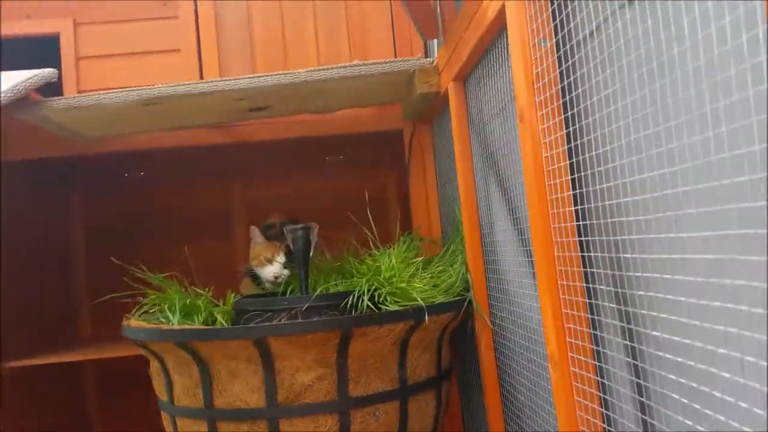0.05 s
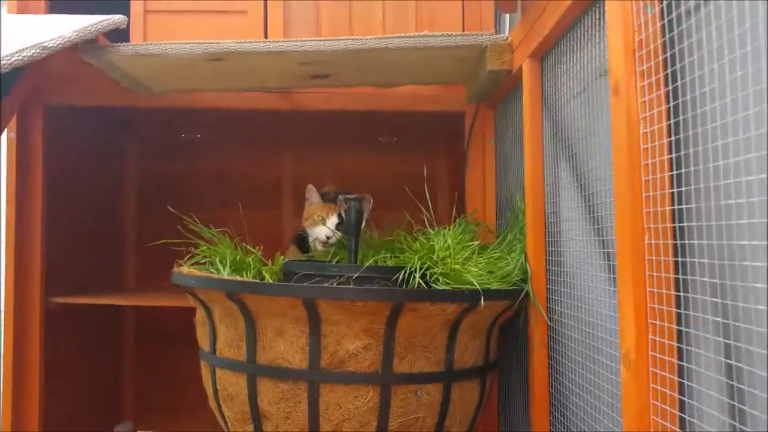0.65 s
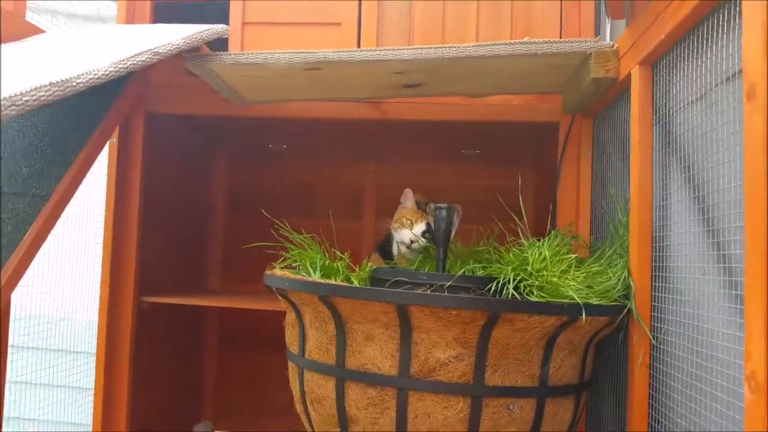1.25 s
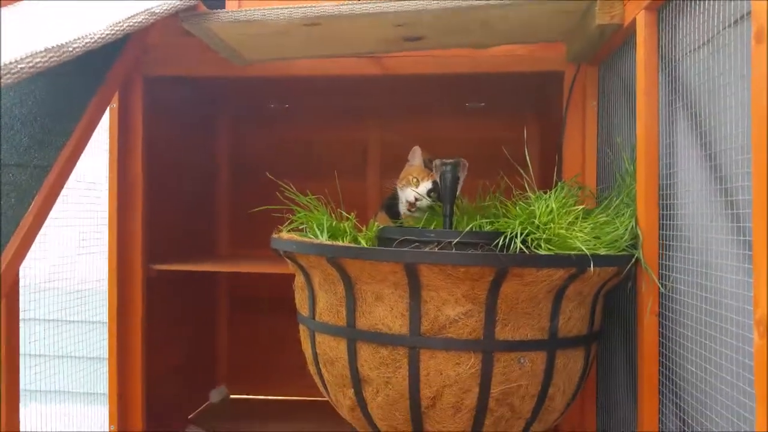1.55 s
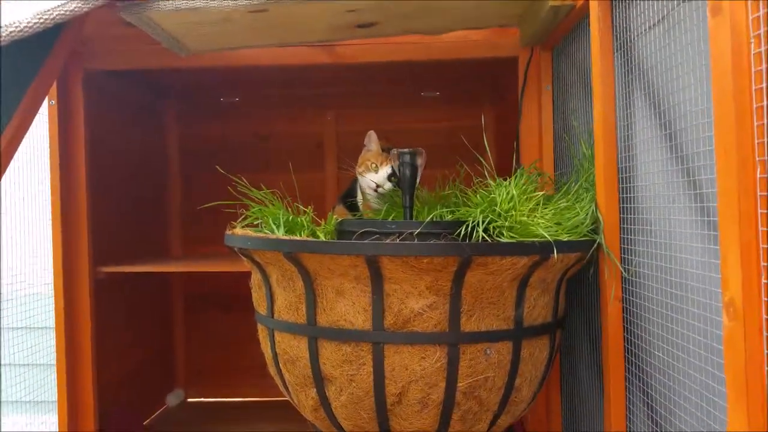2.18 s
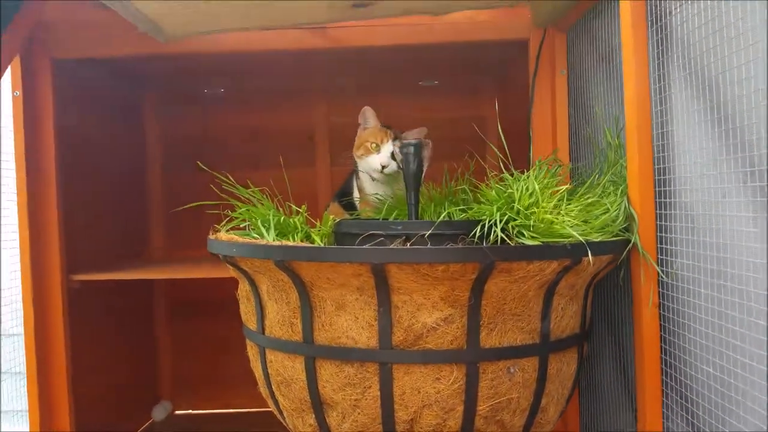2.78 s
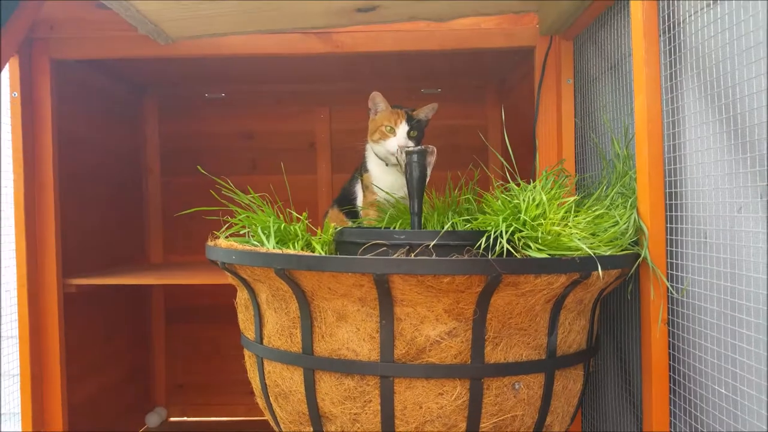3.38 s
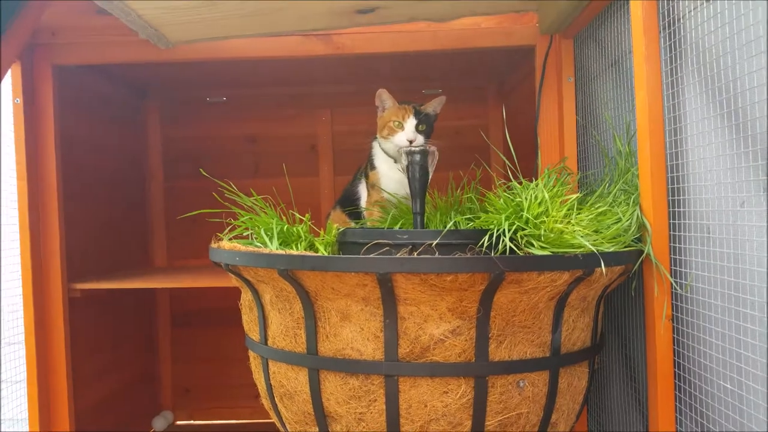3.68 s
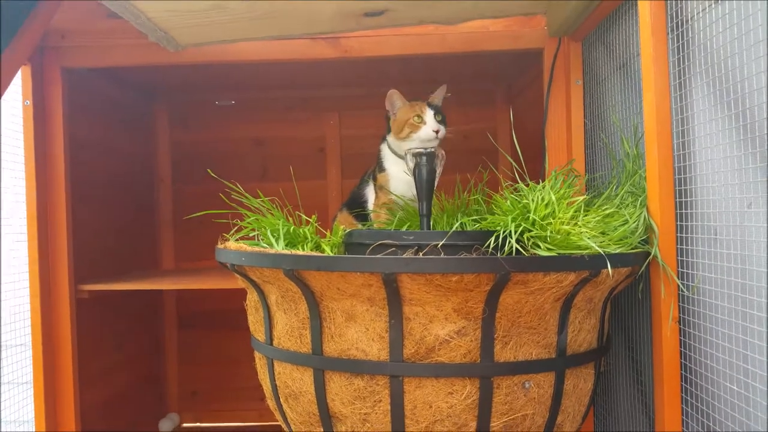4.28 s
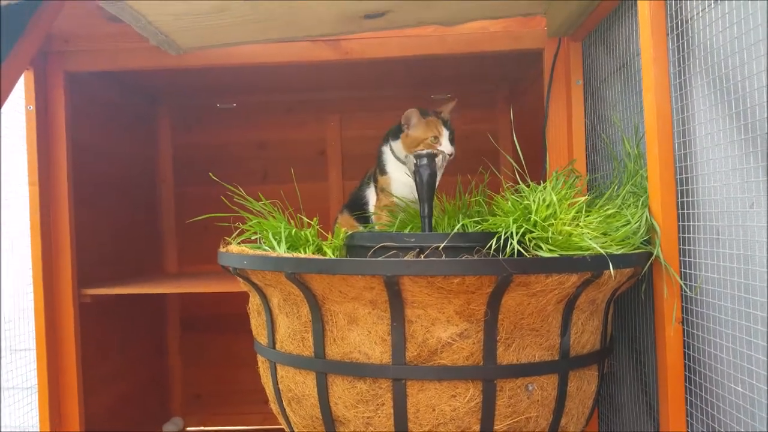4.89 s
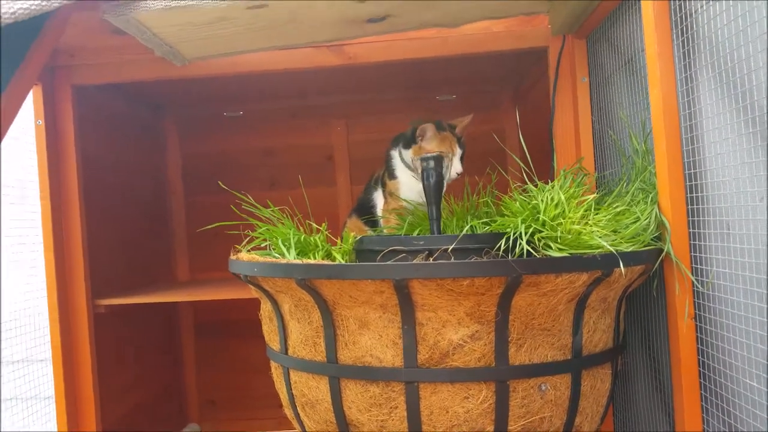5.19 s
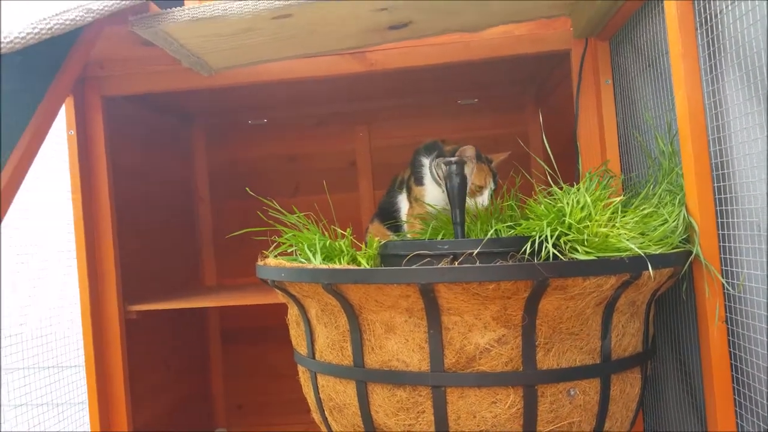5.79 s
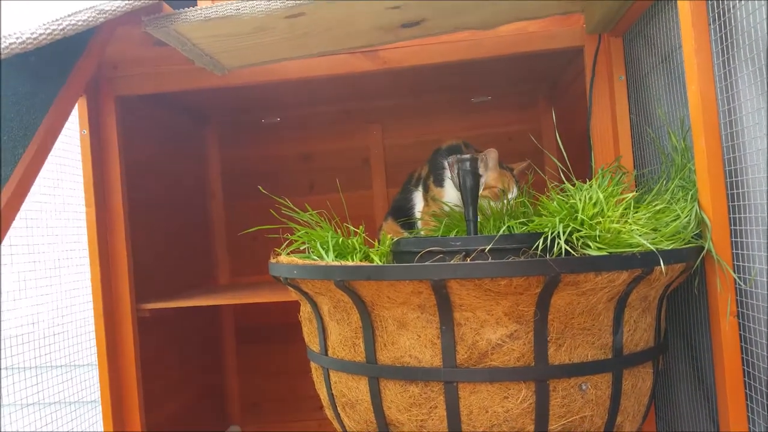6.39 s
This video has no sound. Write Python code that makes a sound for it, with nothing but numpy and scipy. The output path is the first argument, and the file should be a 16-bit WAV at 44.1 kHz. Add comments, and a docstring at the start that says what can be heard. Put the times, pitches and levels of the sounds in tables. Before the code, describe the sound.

Gentle, bright trickling runs throughout as a thin fountain stream breaks into quick drips, tiny bubbles and splashes near the microphone. The boards of an outdoor hutch add a very short echo. A far engine drones low at first and gradually dies down over distant traffic. There are a few faint rustles in the planter and, later, a single soft knock on the plastic basin.

```python
"""Pet fountain in a wooden hutch

A small fountain trickles in a planter inside an open hutch, outdoors. Drops trap air bubbles that plink,
others spatter on the plastic basin, and the thin stream fizzes; the basin is bumped once. The boards
throw the water's sound back. Behind lie a distant engine slowing down, a faint motor whine and traffic."""
import sys
import numpy as np
from scipy import signal
from scipy.fft import rfft, irfft, next_fast_len
from scipy.io import wavfile

SR = 44100
rng = np.random.default_rng(int(sys.argv[2]) if len(sys.argv) > 2 else 0)


def wav_record(signal):
    """Record a signal, one row per channel, as 16-bit PCM in the file named by sys.argv[1]."""
    frames = np.transpose(np.atleast_2d(signal))
    bounded = np.clip(frames, -1, 1)
    # unit amplitude maps onto the largest positive 16-bit level
    quanta = np.round(bounded * 32767).astype(np.int16)
    wavfile.write(sys.argv[1], SR, quanta)


N = 293265
TIME = np.arange(N) / SR
DRIP_REFERENCE_S = .015  # a drip's energy is that of a steady sound this long


# The foreground plinks, one trapped bubble each: (time [s], pitch [Hz], level [dB])
CLEAR_DRIPS = [(.008, 6600, -58), (0.051, 2530, -55), (0.055, 6200, -57), (.116, 7100, -58),
               (.216, 6400, -59), (.218, 1876, -58), (0.266, 4430, -57), (.286, 1714, -54),
               (0.309, 5100, -51), (.355, 3220, -59), (0.416, 1800, -54.5), (0.624, 4400, -60),
               (0.743, 5300, -52.5), (0.818, 4500, -46.5), (.8634, 7030, -56.5), (.896, 1760, -46.5),
               (1.018, 6900, -49.5), (1.073, 5420, -49.5), (1.071, 1770, -58), (1.081, 2410, -49.5),
               (1.086, 3350, -49), (1.155, 3790, -53), (1.173, 6400, -54.5), (1.307, 6000, -55.5),
               (1.459, 4300, -52), (1.460, 5570, -54.5), (1.509, 4340, -54.5), (1.582, 3420, -56.5),
               (1.584, 5000, -55), (1.645, 1650, -44.5), (1.683, 2850, -60), (1.751, 3200, -55.5),
               (1.774, 6470, -59), (1.777, 3577, -57.5), (1.863, 3300, -53), (1.912, 5700, -56.5),
               (1.974, 2700, -55), (2.024, 5170, -54), (2.178, 2540, -57.5), (2.28, 2610, -55.5),
               (2.319, 6000, -53), (2.343, 2780, -55), (2.361, 5800, -58), (2.3895, 3150, -54.5),
               (2.481, 5940, -58.5), (2.61, 5030, -53.5), (2.72, 5230, -49.5), (2.801, 5940, -57),
               (2.835, 2570, -56.5), (2.879, 6380, -56.5), (2.932, 3196, -57), (2.965, 3980, -51.5),
               (2.965, 6360, -54), (2.991, 5200, -55), (3.133, 3650, -52), (3.135, 5700, -57),
               (3.198, 3600, -57), (3.232, 5600, -55), (3.268, 3210, -58), (3.362, 6280, -57),
               (3.422, 4150, -47.5), (3.447, 5330, -52), (3.527, 5600, -57), (3.54, 6030, -53.5),
               (3.645, 6120, -53), (3.678, 7140, -54.5), (3.714, 5447, -56.5), (3.877, 4800, -52.5),
               (3.999, 5100, -58.5), (4.035, 3400, -50.5), (4.056, 6335, -57), (4.091, 6330, -55.5),
               (4.14, 5730, -59), (4.231, 7100, -56.5), (4.241, 1976, -54.5), (4.24, 3287, -54.5),
               (4.293, 2885, -58), (4.308, 5700, -58.5), (4.406, 2780, -55.5), (4.547, 6850, -56.5),
               (4.577, 3400, -52), (4.679, 3010, -51), (4.704, 2343, -54.5), (4.819, 6740, -57),
               (4.881, 3204, -57), (4.947, 2454, -56), (4.98, 5400, -61), (5.1804, 3160, -52),
               (5.222, 2790, -54.5), (5.374, 3300, -51), (5.375, 6070, -42.5), (5.418, 5880, -54),
               (5.453, 2522, -46.5), (5.481, 6000, -50), (5.568, 3600, -58), (5.634, 5800, -51),
               (5.793, 5700, -57), (5.8742, 3276, -55.5), (5.894, 5740, -57), (5.992, 6320, -52.5),
               (6.037, 2950, -43.5), (6.0566, 4930, -47), (6.075, 6500, -59), (6.1714, 5920, -59),
               (6.186, 6610, -55), (6.194, 2700, -45.5), (6.229, 3720, -53), (6.245, 5700, -56),
               (6.2922, 3650, -46.5), (6.339, 6400, -60), (6.373, 2580, -56), (6.378, 5480, -53.5),
               (6.389, 3130, -47), (6.455, 6500, -52), (6.521, 5700, -57), (6.616, 5610, -55)]

def clear_drips():
    """The drops that stand out of the trickle."""
    out = np.zeros((2, N))
    for s, hz, db in CLEAR_DRIPS:
        add(out, s, drip(hz, db))
    return out


# Drip voicing: large bubbles ring cleanly on the left, small ones splash on the right:
# (pitch [Hz], left over right [dB], splash share [0-1], snap [dB], splash width [octaves])
DRIP_VOICING = [(1800, 8.5, .14, -1, 0.09), (2700, 2.5, 0.78, 9, 0.12), (3400, -4, 0.82, 9, 0.16),
                (5000, -3.5, 0.92, 6, 0.35), (6500, -5, 0.62, 5, 0.21)]

def drip(hz, db, max_glide=.037, far_ear_lag_s=.00019):
    """One drip, part ring and part splash by its size; it reaches the far ear a little later."""
    pitches, *columns = np.transpose(DRIP_VOICING)
    side_db, splash_share, snap_db, octaves = [np.interp(hz, pitches, c) for c in columns]
    ring = plink(hz, max_glide * rng.random(), t60_at_4khz=.011, size_power=1.75, fade_power=1.56)
    blend = np.sqrt(1 - splash_share) * ring + np.sqrt(splash_share) * splash(hz, snap_db, octaves)
    ears = amp(db) * pan(side_db) * blend
    far = int(side_db > 0)
    ears[far] = np.roll(ears[far], round(far_ear_lag_s * SR))
    return ears


def plink(hz, glide, t60_at_4khz, size_power, fade_power=1, rise_at_4khz=.0003):
    """A bubble swells and rings down, large ones slowest; its pitch climbs as it nears the surface."""
    t = np.arange(SR // 12) / SR
    size = 4000 / hz  # relative to a 4 kHz bubble
    t60 = t60_at_4khz * size ** size_power
    cycles = np.cumsum(hz * (1 + glide * np.minimum(t / t60, 1))) / SR
    attack = 1 - np.exp(-t / (rise_at_4khz * size ** 2))
    fade = np.exp(-np.log(1000) * (t / t60) ** fade_power)
    return drip_energy(np.sin(2 * np.pi * cycles) * attack * fade)


def splash(hz, snap_db, octaves, t60=.063, rise_s=.0003, snap_s=.0018, grain_db=3, top_hz=7100):
    """Torn water around a new bubble: a quick snap, then a brief crackle spread about its pitch."""
    t = np.arange(SR // 12) / SR
    crackle = band(grit(len(t), grain_db), hz, octaves)
    crackle = signal.sosfilt(signal.butter(12, top_hz, fs=SR, output="sos"), crackle)
    attack = 1 - np.exp(-t / rise_s)
    snap = amp(snap_db * np.exp(-(t / snap_s) ** 2))
    return drip_energy(crackle * attack * snap * decay(t, t60))


def soft_drips(level_db=-63, spread_db=2, low_hz=2600, high_hz=6800, lean=.582):
    """Weaker drips between the clear ones, leaning towards small bubbles."""
    out, chances = np.zeros((2, N)), rng.uniform(size=(200, 2))
    for s, (height, strength) in zip(drop_times(per_s=11.6, jitter=.3), chances):
        hz = low_hz * (high_hz / low_hz) ** (height ** lean)
        add(out, s, drip(hz, level_db + spread_db * (2 * strength - 1)))
    return out


def drop_times(per_s, jitter):
    """The stream breaks into drops at a loose beat; jitter is a share of the gap between them."""
    beats = np.arange(200) + jitter * rng.standard_normal(200)
    return beats[(beats > 0) & (beats < per_s * TIME[-1])] / per_s


def pops(level_db=-67, spread_db=3, low_hz=2300, high_hz=6800, count=360):
    """Tiny bubbles pop between the drips and join them into one trickle."""
    out = np.zeros((2, N))
    for when, height, strength in rng.random((count, 3)):
        hz = low_hz * (high_hz / low_hz) ** height
        add(out, when * TIME[-1], drip(hz, level_db + spread_db * (2 * strength - 1)))
    return out


# Bright accents, the hardest drops on the basin: (time [s], level [dB], centre [Hz], width [octaves])
HARD_SPATTERS = [(.22, -44.5, 10000, 0.83), (0.318, -42, 7000, 1), (.47, -45, 11000, 0.84),
                 (0.818, -48, 9400, .6), (.892, -48, 8000, .5), (1.0715, -42, 8500, 0.75),
                 (1.16, -40.5, 13500, 0.56), (1.39, -48, 12400, 0.28), (1.459, -46, 11000, .5),
                 (1.503, -46, 8000, 0.69), (1.655, -41, 11000, .25), (2.028, -45, 10600, .5),
                 (2.302, -42, 9800, 0.72), (2.719, -50, 10700, .5), (2.825, -47, 12500, .4),
                 (3.126, -46, 10000, .3), (3.339, -46, 10600, .2), (3.368, -46, 11100, 0.22),
                 (3.54, -44, 8700, .4), (3.897, -52, 9080, 0.18), (4.138, -50, 12000, 0.71),
                 (4.294, -45.5, 10600, 0.16), (4.39, -48, 11510, 0.17), (4.528, -53, 12970, 0.18),
                 (4.666, -44, 10600, .45), (4.824, -42, 9000, 1), (4.837, -51, 9900, 0.95),
                 (4.878, -40, 8350, 0.74), (5.044, -42, 6990, 0.51), (5.164, -42, 14000, .3),
                 (5.179, -39, 8980, 1), (5.541, -42, 10500, 0.46), (5.625, -48, 10600, 0.35),
                 (5.72, -45, 13500, .35), (5.8753, -47, 8500, .7), (5.893, -45, 7500, 0.45),
                 (5.97, -44, 10850, 0.43), (6.129, -52, 9300, .15), (6.153, -42, 10540, .3),
                 (6.276, -46, 8400, 0.27), (6.455, -44, 8200, 0.84), (6.549, -42.5, 9000, 0.14),
                 (6.557, -47, 9350, .2)]
# EQ of a bursting drop: (frequency [Hz], level [dB])
SPATTER_EQ = [(300, -10), (1000, -12), (3400, 8), (6300, -2.5), (7800, -3), (10500, -4.5), (13000, -8),
              (16000, -7.5)]

def spatters(trim_db=-6.5, soft_db=-55, spread_db=1, soft_hz=9800, scatter_octaves=.25):
    """Drops hit the basin: the hard ones, and a patter of soft spits, each with its own pitch."""
    out, chances = np.zeros((2, N)), rng.standard_normal((200, 2))
    for s, db, hz, octaves in HARD_SPATTERS:
        add(out, s, burst(db, hz, octaves))
    for s, (height, strength) in zip(drop_times(per_s=13, jitter=.46), chances):
        hz = soft_hz * 2 ** (scatter_octaves * height)
        add(out, s, burst(soft_db + spread_db * np.tanh(strength), hz, octaves=.15))
    return amp(trim_db) * colour(out, SPATTER_EQ)


def burst(db, hz, octaves, rise_s=.001, t60=.073, broadband_db=-13):
    """A drop bursts into a short shower of droplets, most of them of one size."""
    t = np.arange(SR // 8) / SR
    ticks = unit(grit(len(t), grain_db=1))
    shower = unit(band(ticks, hz, octaves)) + amp(broadband_db) * ticks
    attack = 1 - np.exp(-t / rise_s)
    return amp(db) * attack * decay(t, t60) * shower


# How strongly the small bubbles speak across their range: (pitch [Hz], level [dB])
GURGLE_BALANCE = [(1500, -11), (2300, 6), (3300, 3.5), (4700, 2.5), (5600, 6.5), (6500, 3), (7600, -3.5),
                  (12000, -17)]

def gurgle(per_s=2400, level_db=-66, spread_db=2, clump_db=3, clump_hz=20, side_db=-3, count=64):
    """A crowd of small bubbles, born in loose clumps, blurs into a wash."""
    out, clumps_db = np.zeros((2, N)), clump_db * drift(clump_hz)
    pitches = np.geomspace(GURGLE_BALANCE[0][0], GURGLE_BALANCE[-1][0], count)
    strengths = amp(spread_db * np.minimum(rng.exponential(1, N), 3) + clumps_db)
    births = strengths * (rng.random(N) < per_s / SR)
    pitch_index = rng.integers(0, count, N)
    for k, (hz, side) in enumerate(zip(pitches, rng.random(count))):
        ring = plink(hz, glide=.08, t60_at_4khz=.022, size_power=1)
        rings = signal.oaconvolve(births * (pitch_index == k), ring)[:N]
        out += amp(read(GURGLE_BALANCE, hz)) * pan(side_db + 10 * (side - .5)) * rings
    return unit(out) * amp(level_db)


# EQ of the stream's fizz: (frequency [Hz], level [dB])
SPRAY_EQ = [(300, -8), (1000, 14), (2000, -6.5), (3400, 6.5), (4700, 1.5), (6300, 3.5), (7800, -1.5),
            (10500, -0.5), (13000, -0.5), (15000, -0.5), (16000, -3.5)]

def spray(per_band_per_s=4500, level_db=-61, mist_db=-6, clump_db=3, clump_hz=60):
    """Tiny droplets tick in clumps, each size with its own colour, over an even mist of hiss."""
    out, shared_clumps = np.zeros((2, N)), drift(clump_hz)
    for hz in np.geomspace(1500, 12000, 6):
        ticks = (rng.random(N) < per_band_per_s / SR) * rng.standard_normal((2, N))
        ticks *= amp(clump_db * (shared_clumps + drift(clump_hz)))
        out += band(ticks, hz, octaves=.39)
    mist = amp(mist_db) * rng.standard_normal((2, N))
    return colour(unit(out) + mist, SPRAY_EQ) * amp(level_db)


# Light scrapes in the planter: (time [s], length [s], centre [Hz], width [octaves], level [dB])
PLANTER_RUSTLES = [(1.898, 0.14, 3740, 0.58, -58), (2.01, 0.094, 3160, 0.99, -57),
                   (2.05, 0.053, 1190, 0.62, -57.5), (3.115, 0.18, 3400, .12, -63.5),
                   (4.67, 0.1, 4400, 0.035, -63)]

def rustles():
    """Short swells of rubbing noise."""
    out = np.zeros((2, N))
    for s, length, hz, octaves, db in PLANTER_RUSTLES:
        rub = band(rng.standard_normal((2, SR // 4)), hz, octaves)[:, :round(length * SR)]
        add(out, s, amp(db) * unit(rub * signal.windows.tukey(rub.shape[1], .7)))
    return out


# The hollow modes of the plastic basin: (frequency [Hz], level [dB], t60 [s])
BASIN_MODES = [(636, -7, 0.058), (720, 0, 0.17), (810, -2, .06)]

def knock(at_s=4.69, push_s=.024, level_db=-47, side_db=-3, rub_db=-6, rub_hz=720):
    """Something soft bumps the basin: a brief rub, and a hollow ring that lingers."""
    out, t = np.zeros((2, N)), np.arange(SR // 4) / SR
    push = signal.windows.hann(round(push_s * SR))
    attack = np.cumsum(np.pad(push, (0, len(t) - len(push)))) / push.sum()
    ring = sum(amp(db) * decay(t, t60) * np.sin(2 * np.pi * (hz * t + rng.random()))
               for hz, db, t60 in BASIN_MODES)
    rub = band(rng.standard_normal((2, len(t))), rub_hz, octaves=.2)[:, :len(push)]
    add(out, at_s, np.sqrt(2) * attack * ring)
    add(out, at_s, amp(rub_db) * unit(rub * push))
    return amp(level_db) * pan(side_db) * out


# The hutch's short, woody tail: (frequency [Hz], t60 [s])
HUTCH_DECAY = [(500, 0.21), (2000, 0.057), (6000, 0.056), (15000, 0.067)]

def hutch(dry, wet_db, echo_db=-26, predelay_s=.002, echo_s=.034, paths=3):
    """Close boards answer at once, a farther wall later; the paths shift as drops land in new places."""
    wet = np.zeros((2, N))
    for k in range(paths):
        taps = rng.standard_normal((2, SR // 4)) * (rng.random((2, SR // 4)) < .08)
        hz, t, spectrum = signal.stft(taps, SR, nperseg=128)
        tail = signal.istft(spectrum * decay(t, read(HUTCH_DECAY, hz)[:, None]), SR, nperseg=128)[1]
        tail /= np.linalg.norm(tail, axis=1, keepdims=True)
        response = np.zeros((2, SR // 3))
        add(response, predelay_s, amp(wet_db) * tail)
        add(response, echo_s, amp(echo_db) * tail[::-1])  # left and right swapped
        crossfade = np.cos(np.pi * (2 * TIME + k / paths)) * np.sqrt(2 / paths)
        wet += signal.oaconvolve(dry * crossfade, response, axes=1)[:, :N]
    return dry + wet


# The distant engine slows and fades: (time [s], firing rate [Hz], level [dB])
ENGINE_SLOWDOWN = [(0, 48, -36), (.15, 49.1, -37), (.9, 48.97, -36), (1.1, 47.86, -38.5),
                   (2.4, 46.37, -41.5), (2.48, 45.15, -52), (3, 45.07, -47.5), (3.12, 43.72, -59),
                   (3.45, 43.66, -51), (3.54, 43.3, -64), (3.64, 43.8, -53), (4.05, 43.72, -46.5),
                   (5.4, 43.63, -54), (5.8, 43.6, -54), (5.97, 44.1, -74), (6.25, 42.92, -61),
                   (6.4, 42.76, -53)]

def engine(trim_db=-.3, waver_db=.64, flutter_db=1, third_db=-60.5, boom_db=9, side_db=2):
    """A deep, uneven exhaust note whose third harmonic booms for a moment."""
    hz, db = curves(ENGINE_SLOWDOWN)
    phase = 2 * np.pi * np.cumsum(hz) / SR
    note = amp(db + trim_db + waver_db * drift(15) + flutter_db * drift(30)) * np.sin(phase)
    third = amp(third_db + boom_db * boom_swell()) * np.sin(3 * phase + .4 * drift(4.8))
    return np.sqrt(2) * pan(side_db) * (note + third)


def boom_swell(start_s=2.37, end_s=3.55, rise_s=.35, fall_s=.12):
    """The boom's envelope, 0-1: it rises, holds and drops back."""
    return np.clip(np.minimum((TIME - start_s) / rise_s, (end_s - TIME) / fall_s), 0, 1)


# The far motor's sinking whine: (time [s], pitch [Hz], level [dB])
MOTOR_GLIDE = [(0, 384.6, -74), (1.4, 382, -68.5), (2.3, 378.1, -69.5), (3.0, 371, -73), (3.4, 369, -67),
               (3.65, 368, -72), (3.95, 367, -63), (4.4, 359.8, -66), (4.95, 353.6, -71), (5.4, 352, -67.5),
               (5.8, 352, -65.5), (6.25, 351.7, -61.5), (6.65, 344, -63)]
# Its timbre: (harmonic [number], level [dB])
MOTOR_HARMONICS = [(1, 4.5), (2, 5.5), (3, -5)]

def motor(trim_db=-2, side_db=1, wobble=.008, shimmer_hz=36):
    """A whine arrives by many shifting paths, so each harmonic shimmers; a steady path grows as it nears."""
    hz, db = curves(MOTOR_GLIDE)
    rotation = np.exp(2j * np.pi * np.cumsum(hz * (1 + wobble * drift(8))) / SR)
    steady = .7 * TIME / TIME[-1]
    ears = np.zeros((2, N))
    for ear in ears:
        for k, harmonic_db in MOTOR_HARMONICS:
            scattered = (drift(shimmer_hz) + 1j * drift(shimmer_hz)) / np.sqrt(2)
            ear += amp(db + trim_db + harmonic_db) * ((steady + scattered) * rotation ** k).real
    return pan(side_db) * ears


# EQs of the town bed, low rumble, road roar and airy hiss: (frequency [Hz], level [dB])
RUMBLE_EQ = [(20, -16.5), (40, -12), (70, -2), (100, 0), (135, -3), (170, -8.5), (260, -19.5), (600, -46)]
ROAR_EQ = [(60, -33), (140, -17), (200, -1), (330, -4), (480, -9), (900, -15.5), (2500, -41)]
HISS_EQ = [(100, -18), (450, 5), (850, 6.5), (1300, 5), (2200, -0.5), (4000, -20.5), (6300, -7),
           (8000, -40), (12000, -24), (16000, -46)]

def traffic(rumble_db=-50, roar_db=-56.5, hiss_db=-56, boom_db=2, waver_db=.55, side_db=1):
    """Roar and rumble ease off at first, the rumble swells with the boom, and hiss grows at the end."""
    leaving_db = 5.5 * np.exp(-(TIME / .77) ** 2)
    nearing_db = 4.5 * np.exp((TIME - TIME[-1]) / .58)
    swell_db = .74 * leaving_db + boom_db * boom_swell() + waver_db * drift(1.813)
    rumble = amp(rumble_db + swell_db) * outdoors(RUMBLE_EQ)
    hiss = amp(hiss_db + nearing_db) * outdoors(HISS_EQ)
    roar = amp(roar_db + leaving_db) * outdoors(ROAR_EQ)
    return pan(side_db) * (rumble + hiss) + roar


# Brief swells in the low end: (time [s], length [s], pitch [Hz], level [dB])
RUMBLE_SURGES = [(0.0, 0.86, 105.5, -57.5), (5.66, 0.17, 92.7, -51), (5.821, 0.45, 97.8, -55.5),
                 (6.22, 0.36, 133.7, -57)]

def surges(wobble=.046, side_db=3):
    """Short low hums swell out of the rumble, a little to the left."""
    out = np.zeros((2, N))
    for s, length, hz, db in RUMBLE_SURGES:
        phase = 2 * np.pi * np.cumsum(hz * (1 + wobble * drift(14.8))) / SR
        hum = np.sin(phase[:round(length * SR)])
        add(out, s, amp(db) * pan(side_db) * unit(hum * signal.windows.tukey(len(hum), .6)))
    return out


# Stereo image of the open air: (frequency [Hz], left-right coherence [-1 to 1])
EAR_COHERENCE = [(60, 0.93), (160, 0.98), (270, 0.83), (450, 0.32), (740, 0.067), (1220, -0.45),
                 (2000, 0.035), (6000, -0.38)]

def outdoors(eq):
    """Diffuse noise: centred in the bass, wide in the treble."""
    size = next_fast_len(N)
    left, unrelated = rfft(rng.standard_normal((2, size)))
    coherence = read(EAR_COHERENCE, np.fft.rfftfreq(size, 1 / SR))
    right = coherence * left + np.sqrt(1 - coherence ** 2) * unrelated
    return colour(irfft([left, right], size), eq)


def amp(db):
    """Decibels to gain."""
    return 10 ** (np.asarray(db) / 20)


def unit(x):
    """Scales to rms 1."""
    return x / np.sqrt(np.mean(x ** 2) + 1e-20)


def drip_energy(x):
    """Scales each channel to the energy of rms 1 held for DRIP_REFERENCE_S."""
    return x / np.sqrt(np.sum(x ** 2, axis=-1, keepdims=True) / (DRIP_REFERENCE_S * SR))


def decay(t, t60):
    """A fade of 60 dB every t60 seconds."""
    return np.exp(-np.log(1000) * t / t60)


def grit(samples, grain_db):
    """Stereo noise roughened by a random gain on every sample."""
    return rng.standard_normal((2, samples)) * amp(grain_db * rng.standard_normal(samples))


def read(points, hz):
    """A spectrum table at any frequency."""
    f, value = np.transpose(points)
    return np.interp(np.log(hz + 1), np.log(f), value)


def curves(rows):
    """Each column of an automation table at every sample."""
    s, *columns = np.transpose(rows)
    return [np.interp(TIME, s, c) for c in columns]


def colour(x, eq):
    """An EQ that keeps the power of white sound."""
    size = next_fast_len(N)
    gain = unit(amp(read(eq, np.fft.rfftfreq(size, 1 / SR))))
    return irfft(rfft(x, size) * gain, size)[..., :N]


def band(x, hz, octaves):
    """A bell-shaped band on the octave scale."""
    size = next_fast_len(x.shape[-1])
    octaves_away = np.log2((np.fft.rfftfreq(size, 1 / SR) + 1) / hz)
    bell = np.exp(-.5 * (octaves_away / octaves) ** 2)
    return irfft(rfft(x, size) * bell, size)[..., :x.shape[-1]]


def drift(hz):
    """Random wandering of rms 1, up to about hz."""
    knots = np.arange(0, TIME[-1] + 1, .5 / hz)
    return unit(np.interp(TIME, knots, rng.standard_normal(2000)[:len(knots)]))


def pan(db):
    """Stereo gains for a level difference; positive is left."""
    return unit(amp([[db / 2], [-db / 2]]))


def add(mix, s, sound):
    """Mixes a sound in at a time."""
    part = mix[:, max(round(s * SR), 0):][:, :sound.shape[-1]]
    part += sound[..., :part.shape[1]]


def scene():
    """Water in the hutch, the town behind."""
    drips = hutch(clear_drips() + soft_drips() + pops() + spatters(), wet_db=-.5)
    trickle = hutch(gurgle() + spray() + rustles(), wet_db=-2.5)
    return drips + trickle + knock() + engine() + motor() + traffic() + surges()


def record(dry):
    """A steep high cut on the whole mix."""
    high_cut = signal.firwin(801, cutoff=15780, window=("kaiser", 9), fs=SR)
    return signal.oaconvolve(dry, high_cut[None], "same", axes=1)


dry = scene()
out = record(dry)
wav_record(out)
```